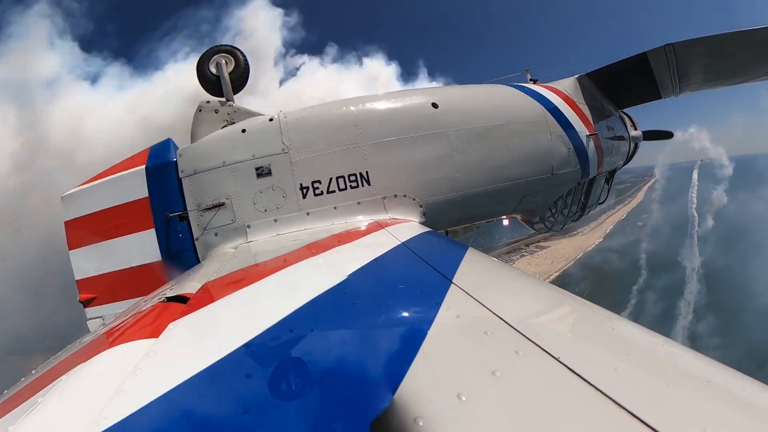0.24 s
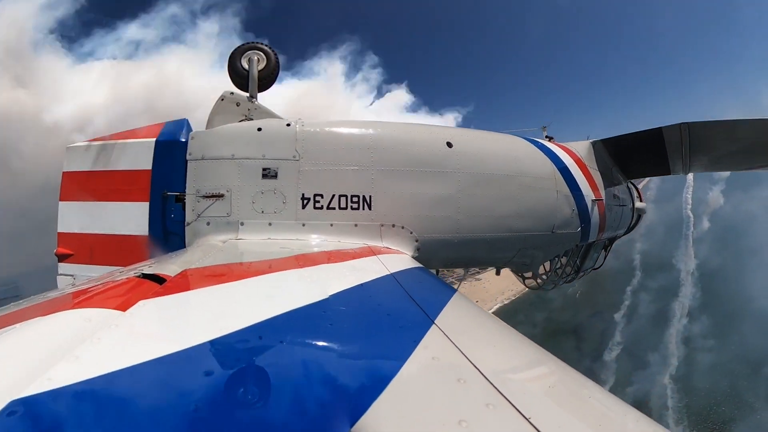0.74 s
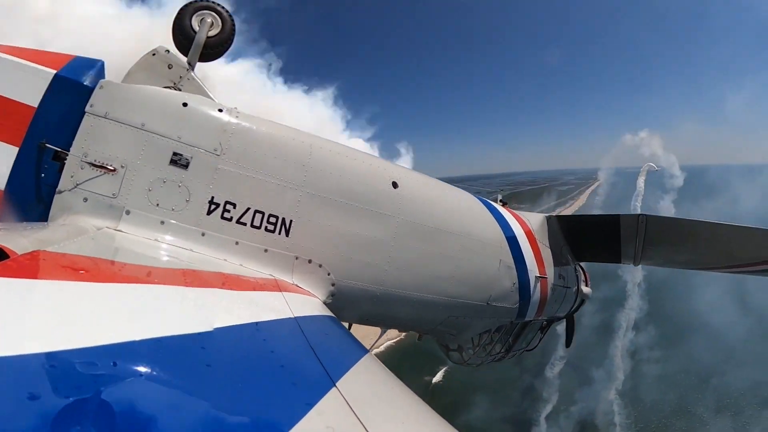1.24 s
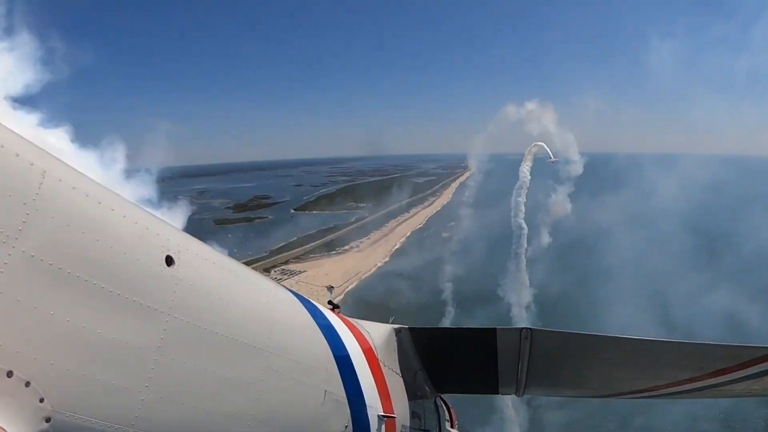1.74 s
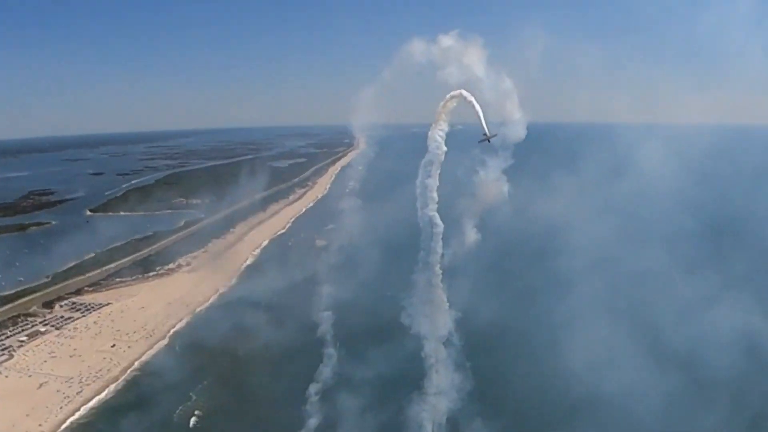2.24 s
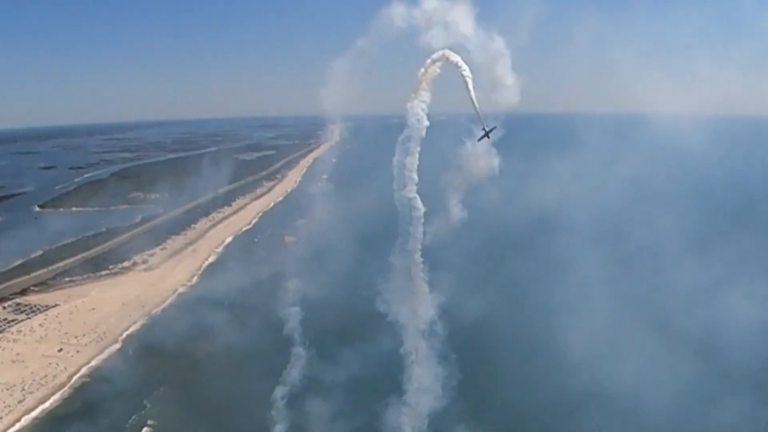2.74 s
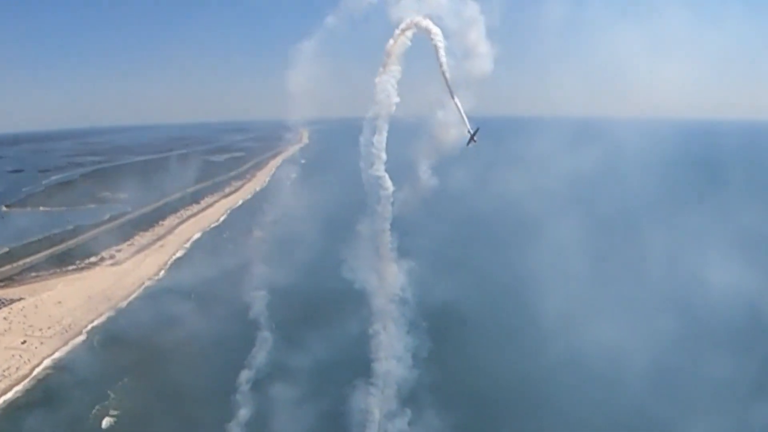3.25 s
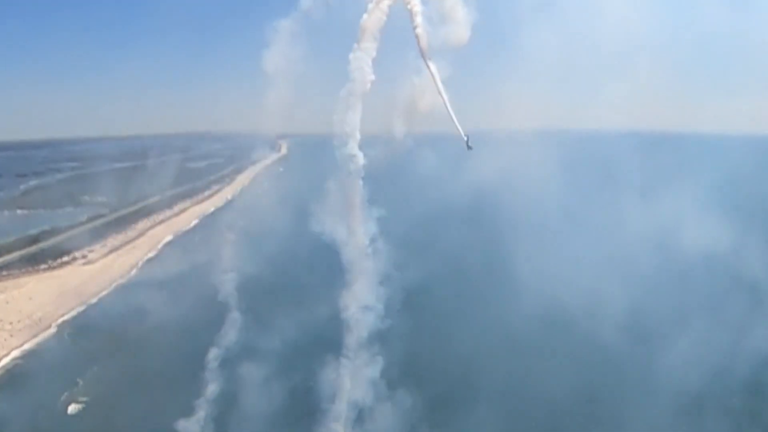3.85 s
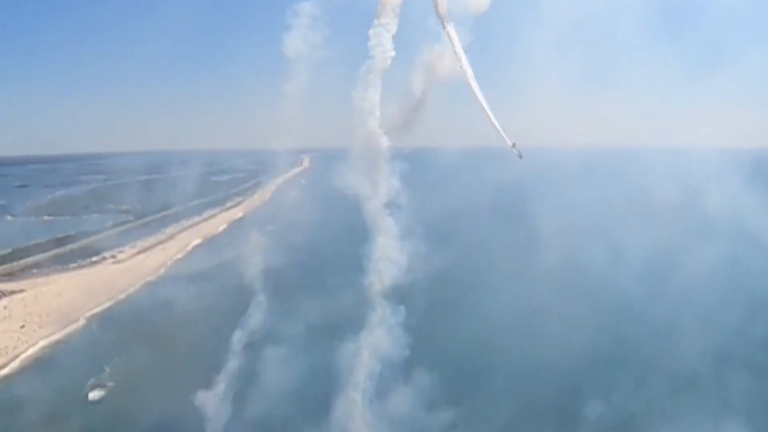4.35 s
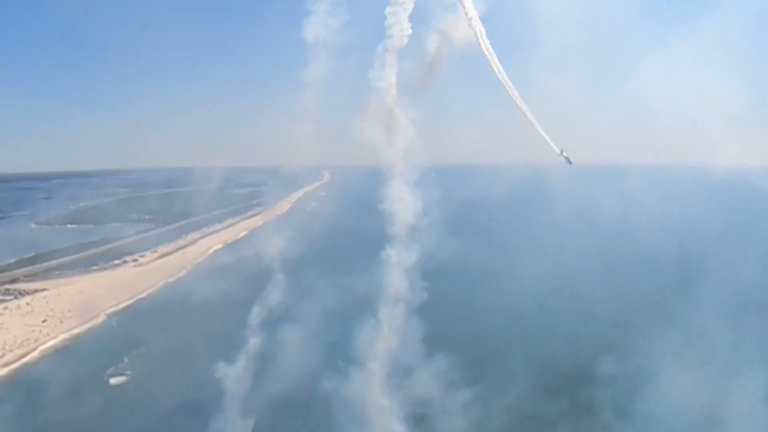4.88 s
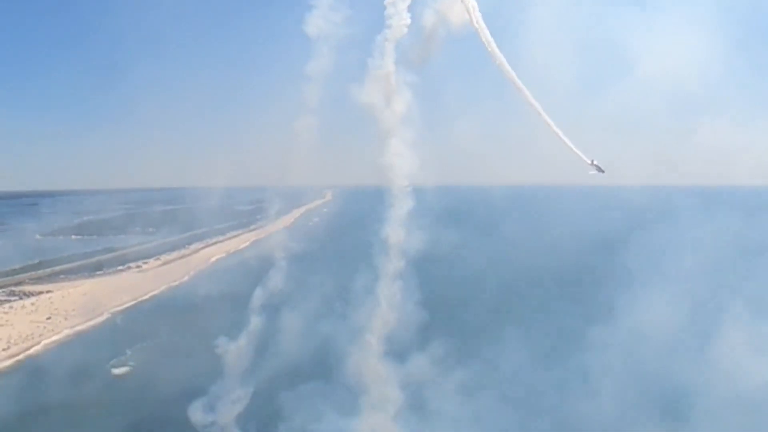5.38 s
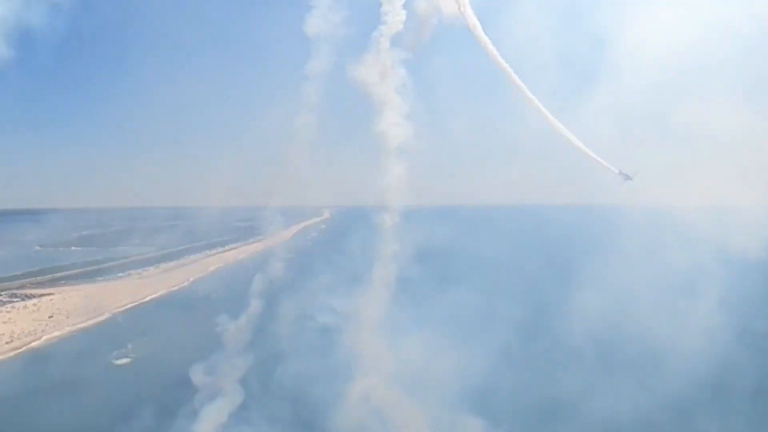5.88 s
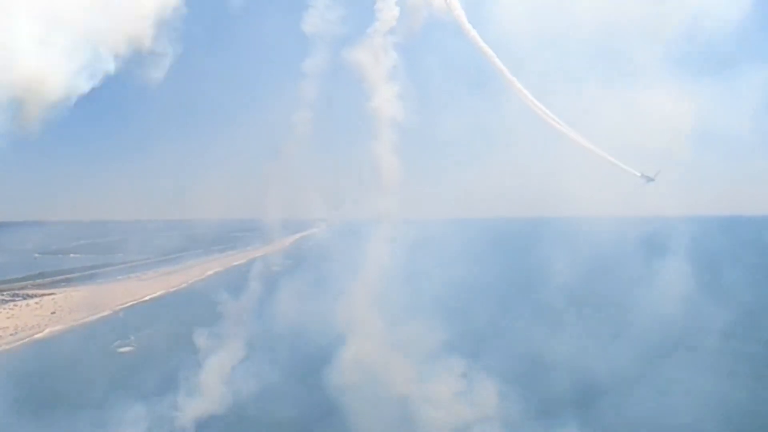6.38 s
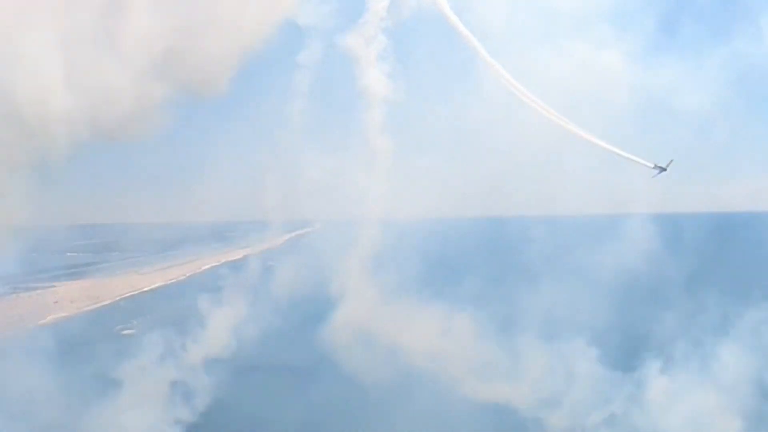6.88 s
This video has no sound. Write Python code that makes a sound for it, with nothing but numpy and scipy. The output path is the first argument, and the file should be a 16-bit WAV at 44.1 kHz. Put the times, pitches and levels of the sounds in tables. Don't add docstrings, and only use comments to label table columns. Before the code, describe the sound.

Close on the wing of a propeller plane, a rough piston engine drones steadily with a faint mechanical whine. Wind thumps and roars over the microphone, growing stronger as the plane dives. Thin high whistles rise, overlap and jump in pitch, then a broken fluttering whistle takes over, joined at the very end by a low panel hum.

```python
import sys
import numpy as np
from scipy import signal
from scipy.fft import rfft, irfft, next_fast_len
from scipy.io import wavfile
from scipy.ndimage import uniform_filter1d, map_coordinates

SR = 44100
rng = np.random.default_rng(int(sys.argv[2]) if len(sys.argv) > 2 else 0)


def unload_audio(sound):
    columns = np.transpose(np.atleast_2d(sound))
    steps = np.round(np.clip(columns, -1, 1) * 32767)
    wavfile.write(sys.argv[1], SR, steps.astype(np.int16))


def to_linear_factor(level_db):
    exponent = np.asarray(level_db, float) / 20
    return 10 ** exponent


N = 313992


def unit(x):
    return x / np.sqrt(np.mean(x ** 2) + 1e-20)


def curves(rows):
    s, *cols = np.transpose(rows)
    return [np.interp(np.arange(N) / SR, s, c) for c in cols]


def wobble(rate, count=N):
    knots = rng.standard_normal(int(count * rate / SR) + 4)
    return map_coordinates(knots, [np.arange(count) * rate / SR])


def turning(hz):
    return 2 * np.pi * np.cumsum(hz) / SR


def law(rule, air_db):
    return rule[0] + rule[1] * air_db


def noise(spectrum, patchy_db):
    z = signal.stft(rng.standard_normal(N + 1024), nperseg=512)[2]
    field = uniform_filter1d(rng.standard_normal(z.shape), size=6, axis=0)
    field = uniform_filter1d(field, size=12, axis=1)
    white = signal.istft(z * to_linear_factor(patchy_db * unit(field)), nperseg=512)[1]
    m = next_fast_len(N + 8192)
    f, db = np.transpose(spectrum)
    log_hz = np.log(np.fft.rfftfreq(m, 1 / SR) + 1)
    colour = to_linear_factor(np.interp(log_hz, np.log(f + 1), db, right=-170))
    return unit(irfft(rfft(white, m) * colour, m)[:N])


def tone(rows, drift_hz, shake_db, rate, octave_db=-90):
    t = np.arange(N) / SR
    fade_s = .016
    gate = np.clip(1 + np.minimum(t - rows[0][0], rows[-1][0] - t) / fade_s, 0, 1)
    on = gate > 0
    count = on.sum()
    s, hz, db = np.transpose(rows)
    hz, db = np.interp(t[on], s, hz), np.interp(t[on], s, db)
    flicker = np.clip(-(db + 28) / 9, 1, 2.5)
    db = db + shake_db * flicker * wobble(rate, count=count)
    phase = turning(hz + drift_hz * wobble(rate, count=count)) + rng.uniform(0, 2 * np.pi)
    overtones = to_linear_factor(octave_db) * (np.sin(2 * phase) + to_linear_factor(-28) * np.sin(3 * phase))
    gate[on] *= np.sqrt(2) * to_linear_factor(db) * (np.sin(phase) + overtones)
    return gate


# (t/s, f/Hz)
SHAFT = [(0, 34.45), (1.5, 34.9), (2.8, 35.5), (4.3, 35.72), (7.12, 35.74)]


def crank_cycle():
    return turning(curves(SHAFT)[0] / 2)


# (multiple of the half-turn rate, early level/dB, late level/dB)
EXHAUST = [(3, -38, -38), (6, -42, -37), (7, -34, -35), (8, -31, -37), (9, -29, -30), (11, -30, -32),
           (12, -36, -36), (14, -38, -38), (16, -33, -32), (17, -42, -38), (18, -41, -39), (19, -40, -42),
           (20, -41, -40), (22, -42, -47)]


def exhaust(cycle):
    late = np.arange(N) / N
    orders = 0
    for multiple, early_db, late_db in EXHAUST:
        level_db = early_db + (late_db - early_db) * late + 1.5 * wobble(4.17)
        orders = orders + to_linear_factor(level_db) * np.sin(multiple * cycle + rng.uniform(0, 2 * np.pi))
    return np.sqrt(2) * orders


# (start t/s, end t/s, multiple of the turn, level/dB)
LOCKS = [(.3, .62, 1, -17.5), (.78, .98, 1, -17), (1.27, 1.76, 1, -14), (1.85, 2.45, 1, -19.5),
         (2.5, 2.95, 2, -18.5), (3.15, 3.3, 2, -20), (3.72, 3.88, 1, -16), (3.98, 4.3, 2, -20),
         (4.42, 4.6, 2, -20), (5.15, 5.32, 2, -17), (5.42, 5.78, 2, -18), (5.95, 6.05, 2, -17),
         (6.45, 7.2, 2, -14)]


def locked(multiple):
    t = np.arange(N) / SR
    edge_s = .06
    gain, share = 0, 0
    for start, end, k, db in LOCKS:
        if round(k) == multiple:
            hold = np.clip(np.minimum(t - start, end - t) / edge_s + .5, 0, 1)
            gain = gain + to_linear_factor(db) * hold
            share = share + hold
    return gain, share


def crank_shake(cycle, air_db):
    gain = np.maximum(to_linear_factor(law((-20.5, -1.5), air_db)), locked(1)[0])
    return np.sqrt(2) * gain * to_linear_factor(0.52 * wobble(8.3)) * np.sin(2 * cycle + .5 * wobble(3.05))


def blades(cycle, air_db):
    gain = np.maximum(to_linear_factor(law((-27.5, .4), air_db)), locked(2)[0])
    return np.sqrt(2) * gain * to_linear_factor(1.5 * wobble(3.6)) * np.sin(4 * cycle + 0.3 * wobble(4.81))


# (t/s, f/Hz, level/dB)
PUMP = [(0, 269.4, -27.5), (2.3, 269.2, -27), (3.3, 273, -27), (5.4, 274.5, -26.5), (6.1, 273.5, -31),
        (7.12, 273, -35)]


def pump():
    return tone(PUMP, .4, 1.1, rate=8)


# (t/s, over-microphone level/dB, cross-flow through mount level/dB)
AIR = [(0, -2.5, -2), (.06, -1.5, -1), (.7, .5, 0), (1.2, -.5, 0), (1.85, -0.5, -1), (2.3, 1.5, 1.5),
       (2.7, 3.5, 2.5), (3.5, 7, 4), (4.2, 6, 2), (5, 9, 4.5), (5.6, 9.5, 5.5), (6.4, 11, 6.5),
       (6.7, 10.5, 7.5), (7.12, 10, 5.5)]


def air_levels():
    return curves(AIR)


# (f/Hz, level/dB per Hz)
BUFFET = [(4, -35), (12, -11), (30, -2), (48, -6), (70, -27), (120, -58.5)]
# (f/Hz, level/dB per Hz)
BUFFET_FAST = [(8, -29), (20, -13), (35, -2.5), (60, 6.5), (90, -3), (130, -2.5), (200, -54)]


def buffet(air_db, calm_db):
    full_dive_db = 17
    fast = np.clip(air_db / full_dive_db, .02, .98)
    slow_eddies = np.sqrt(1 - fast) * noise(BUFFET, patchy_db=2.0)
    fast_eddies = 1.9 * np.sqrt(fast) * noise(BUFFET_FAST, patchy_db=0.0)
    return to_linear_factor(law((-17.5, -0.44), air_db) - calm_db) * (slow_eddies + fast_eddies)


# (f/Hz, level/dB per Hz)
ROAR = [(25, -51), (50, 0), (80, -1.5), (150, -5), (270, -5.5), (400, -12.5), (550, -19), (700, -29.5),
        (1200, -78.5)]


def roar(air_db, calm_db):
    return to_linear_factor(law((-18.5, 0.29), air_db) - .07 * calm_db) * noise(ROAR, patchy_db=0.5)


# (f/Hz, level/dB per Hz)
RUSH = [(150, -33), (350, -2.5), (500, -2.5), (900, -7), (1400, -14), (2100, -22), (3000, -38), (5000, -52)]


def rush(air_db):
    return to_linear_factor(law((-35, 1), air_db)) * noise(RUSH, patchy_db=0.53)


# (f/Hz, level/dB per Hz)
HISS = [(900, -27), (2000, -6.5), (2900, -1), (4000, -4), (5500, -11.5), (7000, -15.5), (8400, -22),
        (9200, -29), (10500, -48.5), (13000, -54)]


def hiss(cross_db):
    return to_linear_factor(law((-40.5, 1), cross_db)) * noise(HISS, patchy_db=-0.14)


# (f/Hz, level/dB per Hz)
AIRY = [(5000, -23), (8500, 0.5), (10000, -1.5), (11200, -3), (12000, -8), (13000, -13), (13800, -19),
        (14500, -25), (16000, -37)]


def airy(cross_db):
    return to_linear_factor(law((-63.5, .3), cross_db)) * noise(AIRY, patchy_db=-0.5)


def airflow(cycle, air_db, cross_db):
    calm_db = 9 * np.clip(locked(1)[1] + locked(2)[1], 0, 1)
    chop = 1 + 0.035 * np.sin(cycle) + 0.048 * np.sin(2 * cycle + 1)
    chop = chop + 0.037 * np.sin(3 * cycle + 2) + 0.044 * np.sin(4 * cycle)
    low = buffet(air_db, calm_db) + roar(air_db, calm_db) + rush(air_db)
    return low + chop * (hiss(cross_db) + airy(cross_db))


# (t/s, f/Hz, level/dB)
THIN_GAP = [(0, 2603, -55), (1, 2635, -53.5), (2.2, 2675, -50), (2.6, 2697, -52)]
FAINT = [(.6, 3170, -56), (.85, 3190, -58), (1.2, 3270, -55)]
WIDE_GAP = [(.65, 2745, -58), (.9, 2850, -50.5), (1.25, 2918, -44), (1.58, 2965, -42), (1.75, 2988, -34),
            (1.95, 2998, -33.5), (1.96, 3047, -38), (2.2, 3066, -32.5), (2.55, 3098, -36.5)]
WIDE_GAP_END = [(2.57, 3102, -37), (2.8, 3165, -52)]
NARROW_GAP = [(1.45, 3350, -58), (1.73, 3418, -45), (2.05, 3447, -41), (2.36, 3497, -35), (2.44, 3552, -34),
              (2.49, 3520, -34), (2.52, 3580, -29), (2.6, 3594, -28), (2.83, 3607, -35.5)]
UPPER_STAGE = [(2.6, 3752, -51), (2.68, 3762, -40), (2.9, 3774, -34.5), (3.4, 3793, -34), (3.7, 3826, -40),
               (4.2, 3920, -58)]
LOWER_STAGE = [(2.78, 3392, -51), (3.27, 3416, -47), (3.45, 3430, -41), (3.7, 3452, -41), (4.02, 3500, -47)]
RETURN = [(4.2, 2465, -53), (4.58, 2548, -43), (4.85, 2590, -43), (4.95, 2590, -52)]
SHELF = [(4.7, 2705, -50), (4.95, 2702, -43), (5.3, 2711, -45)]


def gap_whistles():
    gaps = [THIN_GAP, FAINT, WIDE_GAP, WIDE_GAP_END, NARROW_GAP, UPPER_STAGE, LOWER_STAGE, RETURN, SHELF]
    return to_linear_factor(0.04) * sum(tone(gap, 2.9, 0.67, rate=45) for gap in gaps)


# (t/s, f/Hz, level/dB)
FUZZ = [
    [(.6, 2750, -58), (1.25, 2900, -47), (2, 2990, -49), (2.6, 3030, -52)],
    [(4.4, 2540, -52), (5.15, 2650, -41), (5.6, 2780, -41), (6, 2820, -40), (6.6, 2865, -33),
     (7.12, 2890, -35)],
]


def breath():
    return sum(tone(band, 25.8, 0.31, rate=90) * unit(wobble(230)) for band in FUZZ)


# (t/s, f/Hz, level/dB)
LONG_TONE = [(3.8, 3200, -57), (4, 3240, -50), (4.5, 3285, -48), (4.77, 3348, -43), (5.3, 3391, -42.5),
             (5.7, 3416, -39), (6.3, 3430, -34), (7.12, 3439, -32)]


def long_whistle():
    return to_linear_factor(0.04) * tone(LONG_TONE, 3.3, 0.55, rate=45, octave_db=-20)


# (start t/s, start f/Hz, end f/Hz, level/dB)
FLUTTER = [(5.35, 2790, 2775, -43), (5.45, 2790, 2795, -39), (5.62, 2800, 2862, -33),
           (5.77, 2845, 2872, -31), (5.88, 2852, 2845, -31), (5.955, 2830, 2830, -45),
           (5.99, 2828, 2825, -34), (6.04, 2815, 2870, -32), (6.11, 2830, 2850, -33),
           (6.18, 2865, 2892, -30), (6.25, 2865, 2908, -28), (6.34, 2860, 2895, -30),
           (6.4, 2855, 2885, -28), (6.48, 2905, 2930, -26), (6.55, 2850, 2850, -30),
           (6.585, 2920, 2925, -26), (6.63, 2850, 2910, -27), (6.74, 2900, 2870, -28),
           (6.805, 2948, 2942, -24), (6.94, 2915, 2880, -27), (6.99, 2915, 2930, -25),
           (7.035, 2875, 2870, -27), (7.07, 2905, 2945, -25)]


def flutter():
    pause_s = .019
    ends = [row[0] - pause_s for row in FLUTTER[1:]] + [N / SR]
    catches = 0
    for (start, start_hz, end_hz, db), end in zip(FLUTTER, ends):
        catches = catches + tone([(start, start_hz, db), (end, end_hz, db)], 10, .8, rate=90)
    return to_linear_factor(.5) * catches


# (t/s, f/Hz, level/dB)
PANEL = [(6.66, 211, -33), (6.75, 213, -20.5), (6.84, 216, -22), (6.88, 225, -23), (6.96, 220, -22),
         (7.12, 223, -20.5)]


def panel():
    return tone(PANEL, 1.2, .6, rate=12)


def scene():
    cycle = crank_cycle()
    air_db, cross_db = air_levels()
    engine = exhaust(cycle) + crank_shake(cycle, air_db) + blades(cycle, air_db) + pump()
    whistles = gap_whistles() + breath() + long_whistle() + flutter()
    return (engine + airflow(cycle, air_db, cross_db) + whistles + panel())[None]


def roll_off(x):
    return signal.sosfilt(signal.butter(12, 15050, fs=SR, output="sos"), x)


def record(dry):
    power = np.abs(uniform_filter1d(dry ** 2, size=1400, axis=1)) + 1e-6
    held = dry * (power / to_linear_factor(-26.0)) ** -.16
    held = held / (1 + np.abs(held / .95) ** 4) ** (1 / 4)
    end_fade_s = .002
    held = held * np.clip(np.arange(N)[::-1] / (end_fade_s * SR), .5, 1)
    return roll_off(held)


dry = scene()
out = record(dry)
unload_audio(out)
```